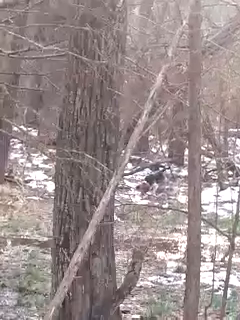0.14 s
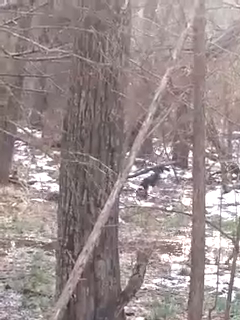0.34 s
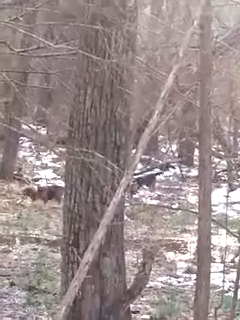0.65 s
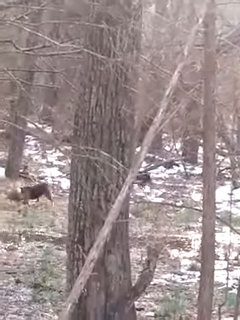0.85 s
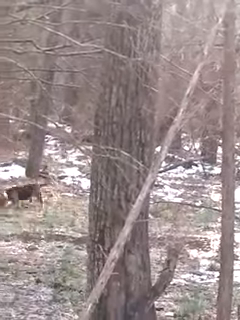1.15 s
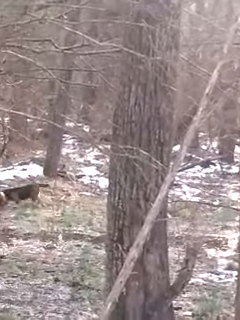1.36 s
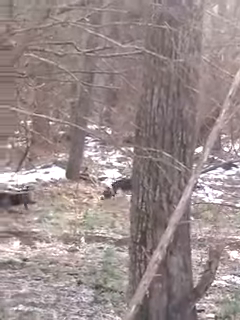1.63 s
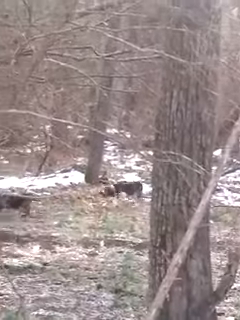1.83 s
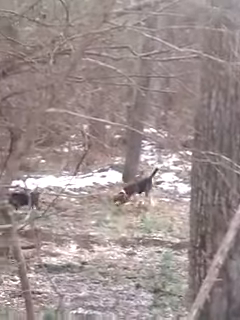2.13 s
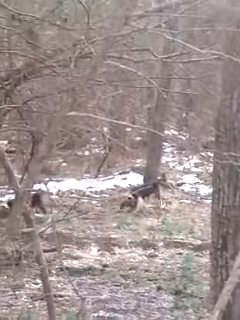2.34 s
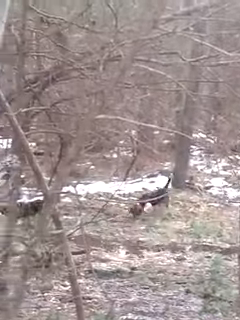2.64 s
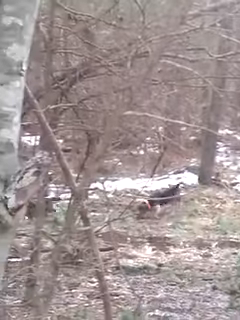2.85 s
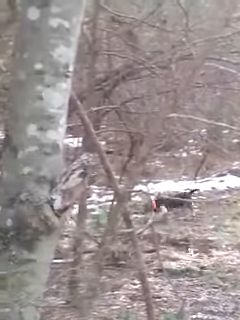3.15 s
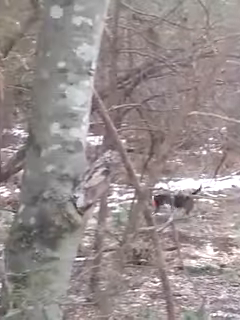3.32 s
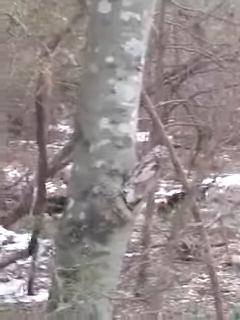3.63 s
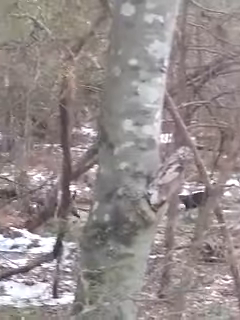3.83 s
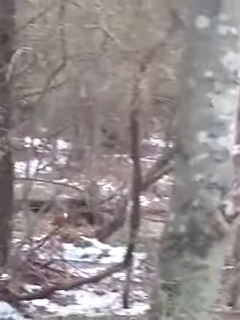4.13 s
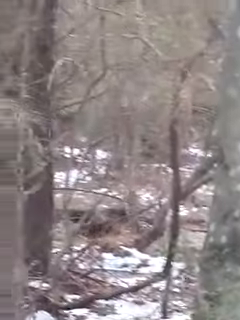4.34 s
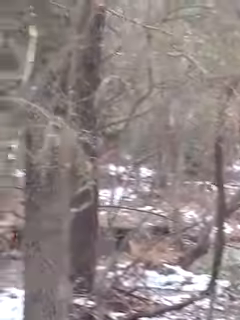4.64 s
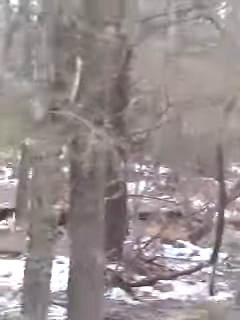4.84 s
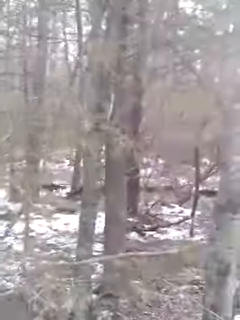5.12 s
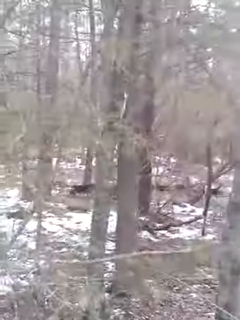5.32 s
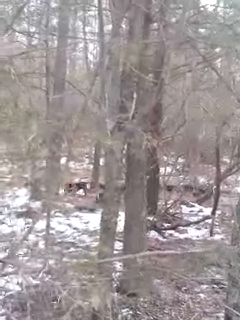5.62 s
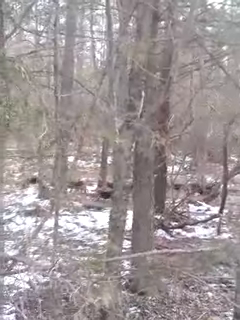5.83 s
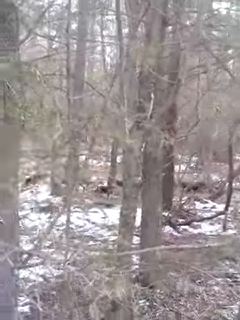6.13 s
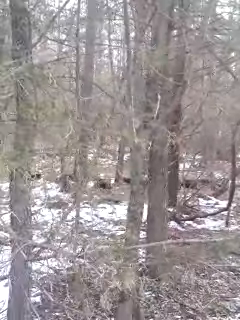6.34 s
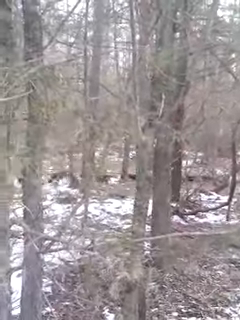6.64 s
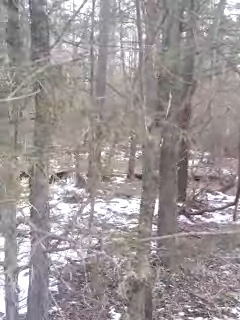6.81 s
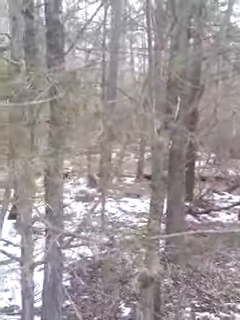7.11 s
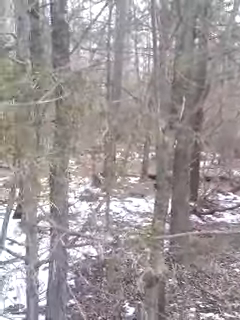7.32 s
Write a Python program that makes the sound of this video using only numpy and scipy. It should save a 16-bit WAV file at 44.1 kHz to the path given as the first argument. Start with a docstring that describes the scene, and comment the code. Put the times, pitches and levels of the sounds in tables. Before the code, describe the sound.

Excited hunting dogs yodel, bark and howl over one another among echoing trees, loud and slightly overloaded, then fade to a few brief cries.

```python
"""Hounds bay in a winter wood some metres away: a clear voice howls near 600 Hz, hoarse ones bark and yodel.
Howls are stacks of partials shaped by the mouth; bays mix a shaky tone with erratic pulses and puffs of air.
Breath hiss follows the pack, and the trunks throw the voices back as a tail of scattered noise.
Twigs snap as sharp cracks with low bumps and leaves rustle as grainy swells, over a faint outdoor hush.
The loudest peaks overload the input, where a fast limiter and a clipper hold them."""
import sys
import numpy as np
from scipy import signal
from scipy.fft import rfft, irfft, next_fast_len
from scipy.io import wavfile
from scipy.ndimage import uniform_filter1d, minimum_filter1d

SR = 44100
rng = np.random.default_rng(int(sys.argv[2]) if len(sys.argv) > 2 else 0)


def unload_wav(signal):
    """Save mono or channel-first audio to the path in sys.argv[1] as 16-bit WAV at rate SR, clipped to [-1, 1]."""
    wavfile.write(
        sys.argv[1],
        SR,
        np.round(np.clip(np.atleast_2d(signal).T, -1, 1) * 32767).astype(np.int16),
    )


def volts_from_decibels(level):
    """Turn decibel levels (scalar or array-like) into linear amplitude factors."""
    exponent = np.asarray(level, float) / 20
    return 10 ** exponent


N = 329427  # length [samples]

# Clear voice, one list a howl, times from the start of the scene:
# point_s [s], pitch_hz [Hz], level_db of the first partial [dB], mouth opening [0 shut, 1 wide]
HOWL_PATHS = [
    [(0.0, 587, -11, 0.7), (0.018, 573, -19.5, 0.45), (0.074, 566.5, -19.5, .7), (0.15, 544, -31.5, 0.6),
     (0.184, 583, -17, .3), (0.23, 508, -25.5, .3)],
    [(0.33, 596, -41, 0), (0.342, 548.2, -18.5, 0.85), (0.368, 602.2, -15.5, 0.76), (0.396, 605, -11, 0.84),
     (0.48, 622, -13, 0.53), (0.634, 557.3, -23.5, 0.97), (0.67, 537, -26, 1), (0.71, 576, -22.5, 0.7)],
    [(0.86, 614, -26.5, 0.7), (0.894, 582.8, -21, 1), (0.926, 559, -11.5, 0.8), (0.968, 574, -8, 0.2),
     (0.99, 684, -10.5, 0.9)],
    [(1.34, 528, -31, 0.3), (1.382, 591, -9.5, 0.72), (1.432, 624.2, -6.5, 0.38),
     (1.476, 597.4, -12.5, 0.67), (1.524, 578.5, -10.5, 0.2), (1.58, 555, -27, 0.7), (1.63, 509, -31.5, 1)],
    [(2.04, 562.3, -30.5, 1), (2.072, 567, -20, 0.67), (2.138, 623.7, -8, 0.41), (2.224, 643.6, -9, 0.33),
     (2.304, 609, -9, 0.44), (2.354, 589, -17.5, 0.68), (2.388, 570.5, -22, 0.92), (2.42, 557.5, -30, .9),
     (2.48, 533, -34.5, 1)],
    [(2.86, 483.6, -42, 0.9), (2.892, 581.6, -18, 0.87), (2.94, 660.2, -11, 0.99),
     (3.014, 610.5, -28, 0.87), (3.058, 606, -8.5, 0.6)],
    [(3.07, 536, -24, 0.3), (3.138, 645.3, -20, 0.5), (3.19, 555, -30, 1), (3.25, 643, -24, 0),
     (3.3, 630, -21.5, 1)],
    [(3.66, 539, -63, 0.8), (3.686, 527.3, -27, 0.75), (3.744, 606.4, -23.5, 1.08),
     (3.784, 611, -17.5, 0.91), (3.808, 605.5, -14.5, 0.85), (3.914, 583, -41.5, 1), (3.93, 593, -49.5, 1)],
    [(4.17, 517, -48.5, .6), (4.19, 568, -24, 0.98), (4.214, 609, -23, 1.1), (4.332, 619, -8, 0.3),
     (4.398, 593.5, -15, 0), (4.462, 616.5, -21, 0), (4.535, 632, -33.5, .5)],
    [(4.53, 602, -30.5, 0.6), (4.632, 601.6, -15.5, 0.4), (4.694, 576, -21.5, 0.5), (4.76, 547, -43, .9)],
    [(4.95, 661, -54, 0.7), (4.968, 612, -17.5, 0.7), (5.125, 601, -15.5, 0.71), (5.216, 640.7, -7, 0.3),
     (5.252, 562, -15.5, 0.64), (5.344, 651, -10, 0.3), (5.368, 621.6, -6.5, 0.1), (5.392, 528, -27.5, 0.9),
     (5.426, 595, -30.5, .8), (5.49, 557, -36, 1)],
    [(5.5, 623.6, -26.5, 0), (5.528, 583, -35.5, 0.8), (5.548, 551, -10.5, 1), (5.61, 629, -38, 0)],
    [(5.77, 497, -63, 0.8), (5.798, 506, -40, .9), (5.826, 547, -26, 0.81), (5.918, 571.5, -17, 0.51),
     (5.976, 530, -29, 0.75), (6.02, 508, -37, 1)],
    [(6.15, 587.5, -30.5, .2), (6.182, 553.6, -24.5, 0.3), (6.262, 563.6, -22, 0.81), (6.35, 609, -20, 0.4),
     (6.392, 611.4, -25, 0.7), (6.528, 607.4, -19, 0.63), (6.596, 533.5, -31, 0.79),
     (6.658, 595.5, -26, 0.7), (6.68, 593, -26, 0.7)],
    [(7.36, 891, -53, 0.91), (7.39, 918, -40.5, 0.95), (7.434, 886, -37.5, 0.92), (7.47, 950, -39, 1.1)],
]
# Throat of each howl: hoarse_db of the skirts at the first partial [dB], third_db and fourth_db [dB offset],
# top_db of the partials above the fourth [dB offset]
HOWL_THROATS = [(-19, 2.5, -1, 6), (-21, -7, -1, 4.5), (-18, 2, 3, 2), (-22.5, 8, -3, 2),
                (-22.5, 1.5, -3, 3), (-21, -12, 4, -11), (-16.5, 3.5, 3.5, 4), (-13.5, 1.5, -0.5, -5),
                (-25.5, 1, 2.5, -2.5), (-26.5, 2, 2.5, 2.5), (-19.5, 1.5, -1, -2), (-16.5, -6, 0.5, -2.5),
                (-8, 0, 3, -1.5), (-16.5, 3, 5.5, 7.5), (-21, -18, -21, -2)]
# Spells where strong and weak pulses alternate, adding lines half-way between partials:
# start_s [s], end_s [s], depth against the first partial [ratio]
PULSE_HALVING = [(4.215, 4.37, 0.33), (5.054, 5.244, 0.21)]
# Partials 2-4 against the first, mouth shut and mouth wide open: level_db [dB]
SHUT_MOUTH_DB = [-46.5, -51, -58]
OPEN_MOUTH_DB = [5, -10, -8.5]
# Partials 5-13 of a howl against the fourth: level_db [dB]
UPPER_PARTIALS_DB = [-13, -19, -23, -28, -27, -33, -36, -40, -46]
FLASH_DB, FLASH_S = 9.5, 0.06  # partials from the third up flare as a howl breaks out, and this fades
VOWEL_DB, VOWEL_S = 5.5, 0.056  # rms swell of each overtone as the tongue shifts, and its smoothing time

# Hoarse voices, barks and sliding squeals, one list a bay, times from the start of the scene:
# point_s [s], pitch_hz [Hz], level_db [dB], roughness [0-1, clipped]
BAY_PATHS = [
    [(0.0, 651, -27.5, .5), (0.074, 753.6, -4.5, 0.5), (0.09, 739.4, -13, 0.2), (0.162, 695.5, -12.5, 0.1),
     (0.21, 745, -30.5, 0)],
    [(0.07, 841, -18.5, 1), (0.09, 951, -10, 0.5), (0.154, 875, -20.5, .05), (0.21, 900, -34, .2)],
    [(0.35, 789, -17, 0.3), (0.376, 747, -14.5, 0.4), (0.408, 780, -22.5, 0.9), (0.446, 796, -19.5, .2),
     (0.5, 785, -10, 0.2), (0.652, 752, -26.5, 0.4), (0.714, 801, -19, 1.1), (0.76, 925, -38.5, .4)],
    [(0.84, 762, -18.5, 0), (0.858, 722, -14.5, 0), (0.874, 727.5, 3, 0.6), (0.928, 647.5, -4.5, 0.3),
     (0.998, 662.7, -8.5, 0.16), (1.096, 657.6, -7.5, 0.14), (1.174, 676.7, -11.5, 0),
     (1.24, 718, -13, 0.3), (1.26, 695, -30, 0.8)],
    [(1.2, 815.5, -20.5, 0), (1.276, 878.4, -10.5, .2), (1.34, 1064, -23.5, 0.1), (1.428, 1334, -8.5, 0.8),
     (1.458, 887, -16.5, 0.5), (1.534, 842, -23, 0), (1.568, 760, -13, .75), (1.6, 745, -41.5, 0)],
    [(1.355, 621, -30, 0.6), (1.385, 657, -16, 0.7), (1.44, 657, -15, 0.6), (1.49, 607, -36, 0.1)],
    [(1.67, 786, -50.5, 0.2), (1.68, 782, -14, 0), (1.7, 794, -5, 0.46), (1.78, 699.4, -11, 0.4),
     (1.866, 689.4, -6, 0.5), (1.894, 718.5, -9, 0), (1.956, 685.6, -13.5, 0), (2.0, 680, 8, 0.08)],
    [(1.8, 781.6, -13.5, 0.8), (1.826, 809.2, -20.5, 0.5), (1.87, 734.6, -9, 0.4), (1.96, 753.6, -9.5, 0.5),
     (2.026, 921, -15, 0.2), (2.044, 1145, -16.5, 0), (2.08, 1030, -15.5, 0.5)],
    [(2.2, 841, -18, 0.5), (2.254, 913.3, -19, 0.7), (2.344, 896, -19, 0.6), (2.36, 848, -32.5, 0.3),
     (2.392, 930, -29.5, 0.5), (2.43, 940, -17.5, 0.8)],
    [(2.51, 606, -47, 0.5), (2.55, 896.3, 2.5, 0.5), (2.584, 759.7, -8.5, 0.4), (2.608, 646.5, -18, .6),
     (2.71, 612, -25, .35), (2.768, 685.6, -18, 0.7), (2.81, 692, -43, 0.8)],
    [(3.04, 771.8, -23.5, 0.1), (3.08, 862, -10.5, 0.8), (3.11, 688.7, -16.5, 1.1),
     (3.182, 623.5, -19, 0.4), (3.216, 748, -22, 0.7), (3.244, 865.5, -8.5, 0.2),
     (3.282, 847.5, -22.5, 0.3), (3.318, 645, -22, 1), (3.512, 685.6, -19.5, 0.9), (3.53, 717, -10, 0)],
    [(3.84, 743, -39, 1.1), (3.858, 828, -17, 0.3), (3.875, 928, -21.5, .3), (3.95, 920, -38, .7)],
    [(4.17, 665, -50, 0.3), (4.202, 653, -18.5, 0.7), (4.238, 662.6, -3, 0), (4.25, 611, -11.5, 0.4),
     (4.3, 657, -15, 0.5)],
    [(4.33, 656, -22.5, 0.5), (4.386, 763, -20.5, 0.5), (4.46, 802.3, -29, .3), (4.528, 692.4, -24, 0.6),
     (4.56, 698, -21.5, 0.4), (4.702, 877, -29.5, 0.6), (4.728, 1114, -26.5, 0.2), (4.76, 1064, -51, 0.1)],
    [(4.94, 976, -45, 0.4), (4.96, 1001, -6.5, .6), (4.986, 906.5, -9, 0.7), (5.018, 806.4, -1, 0.16),
     (5.094, 679.6, -9.5, 0.5), (5.13, 740, -7, .07)],
    [(5.07, 864.6, -29.5, 0.3), (5.144, 986, -14.5, 0.2), (5.256, 1038, -32, 0.2), (5.31, 906.7, -19, 0.6),
     (5.4, 1073, -24.5, 0), (5.44, 977, -33.5, 0)],
    [(5.5, 690.7, -20.5, 0.4), (5.534, 684.5, -5.5, .55), (5.632, 639.4, -9.5, 0.24),
     (5.688, 711.5, -17.5, 0.3), (5.708, 786, -14.5, 0.5), (5.73, 828, -6.5, 0.2)],
    [(6.14, 688.6, -63, .1), (6.172, 729.3, -12.5, 0.1), (6.196, 681.3, -1, 0.9), (6.226, 671, -8.5, 0),
     (6.332, 892, -12, 0.4), (6.36, 804, -43.5, 0.7)],
    [(6.17, 918, -18.5, .4), (6.188, 990, -19, 0), (6.2, 911, -22, 0.4), (6.25, 770, -0.5, .05)],
    [(6.37, 752, -21, 0.1), (6.428, 815, -30.5, 0.6), (6.444, 791.5, -43, .6), (6.556, 774.4, -29.5, 0.6),
     (6.608, 907, -31, 0.7), (6.66, 880, -34.5, .6)],
    [(6.82, 756, -37, .2), (6.848, 849, -9, .95), (6.884, 939, -9, .95), (6.916, 675.4, -6.5, 0.4),
     (6.96, 676.6, -13.5, .6), (7.004, 797.5, -13, .6), (7.06, 820, -24.5, 0.4)],
    [(7.17, 821, -42.5, 0), (7.19, 792, -28, 0), (7.202, 792.4, -19, 0.4), (7.276, 720, -25.5, 0.9),
     (7.32, 825, -34.5, 0.5)],
    [(7.36, 797, -30, 0.3), (7.376, 831, -29, 1), (7.41, 857, -27, 0.7), (7.47, 918, -26.5, 0)],
]
# Mouth of each bay: bright_db against its level [dB], half_fade_db, half the later change [dB],
# middle_mouth_hz, the resonance at middle pitch [Hz], overtone_db of partials 2-4 [dB]
BAY_MOUTHS = [(-24.5, -5, 2700, -39.5), (-30, -1.5, 2300, -32.5), (-15.5, -6.5, 2300, -37),
              (-22.5, -3.5, 2000, -31.5), (-20.5, 2.5, 1900, -31), (-2.5, 3, 2700, -30),
              (-13, -14, 2000, -29), (-29.5, 4.5, 1900, -26.5), (-16.5, -0.5, 1750, -31.5),
              (-19.5, 0.5, 2170, -31), (-18, 0.5, 2100, -31), (-12, -4.5, 2300, -23.5),
              (-12.5, -2, 2150, -27), (-21, 0.5, 1600, -30.5), (-17, -11, 2150, -35),
              (-10.5, -2.5, 1700, -37.5), (-9.5, -21.5, 2400, -25.5), (-15, -7, 2200, -27),
              (-20, 1, 2800, -32), (-7, -0.5, 780, -31), (-8.5, -13, 1270, -35), (-22.5, 7, 2300, -34.5),
              (-15.5, -1, 1750, -30)]
# Colour of the low part of the rasp, from the chest: freq_hz [Hz], level_db [dB]
CHEST_COLOUR = [(400, -36), (520, 7.5), (700, 4), (950, 10.5), (1300, -1), (1600, -13.5), (2500, -54.5)]
# Colour of the bright part of the rasp, from the mouth: freq_hz [Hz], level_db [dB]
MOUTH_COLOUR = [(1100, -6), (1450, 2.5), (1800, 5.5), (2300, 8), (2700, 4), (3200, 1), (3600, -13.5),
                (5000, -53), (8500, -45.5), (10000, -75), (14000, -87)]
BRIGHT_FADE_S = 0.18  # time in which the bright rasp settles
MIDDLE_HZ, MOUTH_FOLLOWS = 780, 0.4  # mouth resonance rises as this power of pitch over middle pitch

# Level difference of one source between the two microphone ports: freq_hz [Hz], left_minus_right_db [dB]
PORT_TILT = [(100, 4.8), (500, -2.5), (1000, 0.4), (2000, 0.5), (3000, 8.5), (4000, -4.5), (7000, -11),
             (10000, 5)]
# Phase by which the left port leads the right: freq_hz [Hz], lead_rad [radians]
PORT_LEAD = [(260, -.2), (600, 0), (780, .1), (1380, -.5), (1720, -.2), (2070, .9), (2840, .3), (4500, .8),
             (8000, 1.5)]

# Colour of air past the teeth: freq_hz [Hz], level_db [dB]
TEETH_COLOUR = [(3000, -9), (3700, -1.5), (4300, 6), (5200, 4), (6000, -1), (7100, 3), (8300, -1.5),
                (9500, -31.5), (13000, -53)]
BREATH_DB, BREATH_FOLLOWS = -41.5, 0.56  # hiss where the brightened pack has rms 1; dB for each dB of the pack
BREATH_S = 0.011  # smoothing of the loudness that the hiss follows

# Decay of the echo among the trunks: freq_hz [Hz], t60_s [s]
WOOD_DECAY = [(300, 0.5), (600, 0.86), (1200, 0.8), (2500, 0.95), (5000, 1.52), (10000, 0.35)]
# Left-right likeness of that echo: freq_hz [Hz], likeness [-1 to 1]
WOOD_LIKENESS = [(500, .98), (750, .92), (1200, .3), (2500, 0), (6000, 0)]
WOOD_DB = -11

# Twigs snapping: start_s [s], crack_db peak [dB], thud_db [dB], left_minus_right_db of the crack [dB],
# thud_hz [Hz]
TWIG_SNAPS = [(0.9074, -8.5, -30, 3, 60), (0.9151, -16.5, -28, 4.5, 60), (1.3865, -18, -55, 7.5, 100),
              (2.4, -19.5, -60, -0.5, 150), (2.865, -17, -87, 0.5, 150), (4.3903, -16.5, -35, -4.5, 170),
              (4.5124, -23.5, -42, 10, 170), (4.5485, -10, -37, 20.5, 170)]
# Colour of dry cracks and leaves: freq_hz [Hz], level_db [dB]
TWIG_COLOUR = [(150, -5.5), (600, 0), (1500, 1.5), (3000, 4.5), (6000, -10.5), (9000, -14.5),
               (13000, -31.5), (15000, -53)]
# Dry leaves shifting close by: start_s [s], length_s [s], level_db [dB]
LEAF_RUSTLES = [(3.8, .09, -33), (1.385, .09, -34), (.86, .09, -34)]

# Colour of the outdoor hush: freq_hz [Hz], level_db [dB]
HUSH_COLOUR = [(20, -48), (45, -37.5), (65, -10), (125, -6.5), (250, 0.5), (450, 0.5), (1000, 3),
               (2000, -9), (4000, -17), (6300, -22.5), (8000, -21.5), (10000, -26), (14000, -31)]
# Left-right likeness of the hush: freq_hz [Hz], likeness [-1 to 1]
HUSH_LIKENESS = [(50, 0.63), (130, .7), (250, 0.93), (1000, 0.22), (4000, 0.25), (10000, 0.048)]
# Moving air, felt mostly below 300 Hz: point_s [s], level_db [dB]
AIR_GUSTS = [(0, 8), (.6, 1.5), (2, 3), (2.999, -7.5), (4.199, -3), (5.501, 2), (6.5, 2), (7.47, 4.5)]
HUSH_DB = -41.5


def evened(x):
    """Scales a sound to rms 1."""
    return x / np.sqrt(np.mean(x ** 2) + 1e-20)


def read(points, hz):
    """Reads a curve along a logarithmic frequency axis."""
    f, value = np.transpose(points)
    return np.interp(np.log(hz + 1), np.log(f + 1), value)


def add(mix, s, sound):
    """Lays a sound into the mix at s seconds."""
    part = mix[..., max(round(s * SR), 0):][..., :sound.shape[-1]]
    part += sound[..., :part.shape[-1]]


def coloured(x, points):
    """Filters a sound by a colour curve and scales it to rms 1."""
    size = next_fast_len(len(x) + 2048)
    gain = volts_from_decibels(read(points, np.fft.rfftfreq(size, 1 / SR)))
    return evened(irfft(rfft(x, size) * gain, size)[:len(x)])


def smoothed_2d(x, bins, frames):
    """Smooths random values over frequency and time, then scales them to rms 1."""
    return evened(uniform_filter1d(uniform_filter1d(x, bins, 0), frames, 1))


def wander(count, seconds):
    """Smooth chance of rms 1 that changes in about this time."""
    width = max(round(seconds * SR), 1)
    return evened(uniform_filter1d(uniform_filter1d(rng.standard_normal(count), width), width))


def curves(rows):
    """Draws straight lines between the points of a voice, sample by sample."""
    s, *columns = np.transpose(rows)
    t = np.arange(s[0], s[-1], 1 / SR)
    return t, [np.interp(t, s, c) for c in columns]


def edges(t, rise, fall):
    """Rounded fade in and out, in seconds."""
    fade_in = np.clip((t - t[0]) / rise, 0, 1)
    fade_out = np.clip((t[-1] - t) / fall, 0, 1)
    return np.sin(np.pi / 2 * fade_in * fade_out) ** 2


def resonate(x, hz, width):
    """Shifts the curve hz down to zero, smooths, and shifts back: a resonance of gain 1."""
    turn, r = np.exp(2j * np.pi * np.cumsum(hz) / SR), np.exp(-np.pi * width / SR)
    return 2 * (turn * signal.lfilter([1 - r], [1, -r], x / turn)).real


def paired(frames, same, size):
    """Two channels of random short-time spectra with the given likeness."""
    a, b, c, d = rng.standard_normal((frames, size // 2 + 1, 4)).T
    like = np.clip(read(same, np.fft.rfftfreq(size, 1 / SR)), -1, 1)[:, None]
    left = a + 1j * b
    return np.array([left, like * left + np.sqrt(1 - like ** 2) * (c + 1j * d)])


def howl(rows, hoarse_db, third_db, fourth_db, top_db):
    """Regular folds: partials brightened by the open mouth, the higher ones shakier, with hoarse skirts."""
    jitter, shimmer_db = .007, 1.4  # rms pitch ratio; rms dB at the first partial
    smear = .5  # power of the partial number by which shimmer and skirts grow
    t, (hz, level_db, mouth) = curves(rows)
    partial_db = [level_db]
    for shut, wide in zip(SHUT_MOUTH_DB, OPEN_MOUTH_DB):
        partial_db.append(level_db + shut + (wide - shut) * mouth)
    flash_db = FLASH_DB * np.exp(-(t - t[0]) / FLASH_S)
    partial_db[2] = partial_db[2] + third_db + flash_db
    partial_db[3] = partial_db[3] + fourth_db + flash_db
    partial_db += [partial_db[3] + top_db + db for db in UPPER_PARTIALS_DB]

    angle = 2 * np.pi * np.cumsum(hz * (1 + jitter * wander(len(t), 0.0086))) / SR
    stack = np.zeros(len(t))
    for k, db in enumerate(partial_db, 1):
        skirt = 1 + volts_from_decibels(hoarse_db) * k ** smear * wander(len(t), .003)
        vowel_db = VOWEL_DB * wander(len(t), VOWEL_S) * (k > 2)
        shake_db = shimmer_db * k ** smear * wander(len(t), 0.018)
        stack += volts_from_decibels(db + vowel_db + shake_db) * skirt * np.cos(k * angle + k * k)

    depth = sum(d * np.clip(np.minimum(t - a, b - t) / 0.0024, 0, 1) for a, b, d in PULSE_HALVING)
    halves = np.cos(3 * angle / 2) + 0.15 * np.cos(angle / 2) + 0.22 * np.cos(5 * angle / 2)
    voice = stack + depth * volts_from_decibels(partial_db[0]) * halves
    return t[0], np.sqrt(2) * voice * edges(t, 0.0043, 0.04)


def bay(rows, bright_db, half_fade_db, middle_mouth_hz, overtone_db):
    """Irregular folds: a shaky tone, and erratic pulses with puffs of air that ring chest and mouth."""
    flutter_db, focus, width_hz = 3.5, 7.6, 300  # tone's rms flutter; gain and width of mouth resonance
    jitter, chaos, puff_gain = .02, .12, .75  # pitch shake, scaled by roughness; rms log pulse rate; ratio
    t, (hz, level_db, rough) = curves(rows)
    rough = np.clip(rough, 0, 1)
    shake = jitter * (.6 + 2 * rough) * wander(len(t), 0.004)
    angle = 2 * np.pi * np.cumsum(hz * (1 + shake)) / SR
    tone = np.sqrt(2) * volts_from_decibels(flutter_db * wander(len(t), 0.0054)) * np.cos(angle)
    for k in (2, 3, 4):
        tone += volts_from_decibels(overtone_db + VOWEL_DB * wander(len(t), VOWEL_S)) * np.cos(k * angle)

    turns = np.cumsum(hz * np.exp(chaos * wander(len(t), .005))) / SR
    pulses = evened(sum(np.cos(2 * np.pi * k * turns) for k in range(1, 12)))
    # each puff is strongest at its pulse and dies away until the next
    puffs = evened((0.39 + np.exp(-(turns % 1) / 0.75)) * rng.standard_normal(len(t)))
    drive = (pulses + puff_gain * puffs) * volts_from_decibels(flutter_db / 2 * wander(len(t), 0.0066))

    mouth_hz = middle_mouth_hz * (hz / MIDDLE_HZ) ** MOUTH_FOLLOWS
    bright = coloured(drive + focus * resonate(drive, mouth_hz, width_hz), MOUTH_COLOUR)
    settled = 1 - np.exp(-((t - t[0]) / BRIGHT_FADE_S) ** 2)
    bright *= volts_from_decibels(bright_db + 2 * half_fade_db * settled)
    voice = (1 - rough) * tone + rough * coloured(drive, CHEST_COLOUR) + bright
    return t[0], volts_from_decibels(level_db) * voice * edges(t, 0.003, 0.02)


def ports(x):
    """The two microphone ports hear one source with their own colour and phase."""
    hz = np.fft.rfftfreq(2 * N, 1 / SR)
    half = volts_from_decibels(read(PORT_TILT, hz) / 2) * np.exp(.5j * read(PORT_LEAD, hz))
    return irfft(rfft(x, 2 * N) * np.array([half, 1 / half]), 2 * N)[:, :N]


def breath(pack, patchy_db=5.0):
    """Air past the teeth: patchy hiss in two mouth resonances that follows the brightened pack's loudness."""
    pack = signal.lfilter([1, -.95], 1, pack) * 10  # weight the loudness towards the treble
    z = paired(N // 128 + 5, [(4000, 0.11), (9000, 0.067)], size=512)  # (Hz, left-right likeness)
    patches = smoothed_2d(rng.standard_normal(z.shape[1:]), 4, 30)
    z *= volts_from_decibels(read(TEETH_COLOUR, np.fft.rfftfreq(512, 1 / SR))[:, None] + patchy_db * patches)
    hiss = evened(signal.istft(z, nperseg=512, noverlap=384)[1][:, :N])
    power = abs(uniform_filter1d(pack ** 2, round(BREATH_S * SR)))
    level_db = BREATH_DB + BREATH_FOLLOWS * 10 * np.log10(power + 1e-7)
    return volts_from_decibels(level_db + np.array([[-2.5], [2.5]])) * hiss  # 5 dB stronger on the right


def wood(x, gap_s=0.02, sparse_db=3.5):
    """Scattered returns from trunks, uneven in time, each band dying at its own rate."""
    z = paired(SR * 3 // 2 // 64, WOOD_LIKENESS, size=256)
    t, hz = np.arange(z.shape[-1]) * 64 / SR, np.fft.rfftfreq(256, 1 / SR)
    decay_db = -60 * t / read(WOOD_DECAY, hz)[:, None]
    z *= volts_from_decibels(decay_db + sparse_db * rng.standard_normal(len(t))) * (t > gap_s)
    tail = signal.istft(z, nperseg=256, noverlap=192)[1]
    tail = tail / np.linalg.norm(tail[0])
    return volts_from_decibels(WOOD_DB) * signal.fftconvolve(x[None], tail, axes=1)[:, :N]


def snaps(crackle_s=.006, crackle_db=-28, thud_s=0.02):
    """A thin dry crack with a faint crackle around it and a low bump through the camera body."""
    out, t = np.zeros((2, N)), np.arange(3000) / SR
    for s, crack_db, thud_db, pan_db, thud_hz in TWIG_SNAPS:
        noise = rng.standard_normal((3, len(t)))
        break_up = volts_from_decibels(crackle_db) * noise[:2] * np.exp(-t / crackle_s)
        break_up[:, 20] += 1  # the crack itself, one click
        crack = np.array([coloured(side, TWIG_COLOUR) for side in break_up])
        crack /= abs(crack).max(1, keepdims=True)
        side_db = np.array([[pan_db], [-pan_db]]) / 2

        low = signal.butter(2, [thud_hz / 2, thud_hz * 2], "band", fs=SR, output="sos")
        thud = evened(signal.sosfilt(low, noise[2])) * np.exp(-t / thud_s) * np.clip(t / .002, 0, 1)
        add(out, s, volts_from_decibels(crack_db + side_db) * crack + volts_from_decibels(thud_db) * thud)
    return out


def rustles():
    """Dry leaves: short swells of grainy hiss, unlike in the two ports."""
    out = np.zeros((2, N))
    for s, length_s, level_db in LEAF_RUSTLES:
        count = round(length_s * SR)
        grains = rng.standard_normal((2, count)) * volts_from_decibels(3.0 * wander(count, .002))
        hiss = np.array([coloured(side, TWIG_COLOUR) for side in grains])
        add(out, s, volts_from_decibels(level_db) * np.hanning(count) * hiss)
    return out


def hush(patchy_db=2.5):
    """Distant air in the branches: patchy noise whose bass swells and sinks with the gusts."""
    z = paired(N // 256 + 5, HUSH_LIKENESS, size=1024)
    patches = smoothed_2d(rng.standard_normal(z.shape[1:]), 10, 12)
    hz = np.fft.rfftfreq(1024, 1 / SR)[:, None]
    t = np.arange(z.shape[-1]) * 256 / SR
    gust_db = np.interp(t, *np.transpose(AIR_GUSTS)) / (1 + (hz / 300) ** 4)
    z *= volts_from_decibels(read(HUSH_COLOUR, hz) + patchy_db * patches + gust_db)
    return volts_from_decibels(HUSH_DB) * evened(signal.istft(z, nperseg=1024, noverlap=768)[1][:, :N])


def scene():
    """The pack at the two ports, its breath and echo, then twigs, leaves and hush."""
    clear, hoarse = np.zeros((2, N))
    for rows, throat in zip(HOWL_PATHS, HOWL_THROATS):
        add(clear, *howl(rows, *throat))
    for rows, mouth in zip(BAY_PATHS, BAY_MOUTHS):
        add(hoarse, *bay(rows, *mouth))
    # small throats give off almost nothing under 500 Hz
    small_throat = signal.butter(8, 520, "high", fs=SR, output="sos")
    pack = clear + signal.sosfilt(small_throat, hoarse)
    return ports(pack) + wood(pack) + breath(pack) + snaps() + rustles() + hush()


def low_pass(x):
    """Removes everything above the highest recorded frequency."""
    return signal.sosfilt(signal.butter(12, 14600, fs=SR, output="sos"), x)


def record(dry, ceiling=1.0, hold_s=0.0054):
    """A fast limiter turns the loudest cycles down and the input clips what is left."""
    width = round(hold_s * SR)
    room = minimum_filter1d(np.minimum(ceiling / (abs(dry).max(0) + 1e-9), 1), width)
    gain = uniform_filter1d(room, width) ** 1.23  # turns down a little further than needed
    held = np.clip(dry * gain, -1, 1)
    return low_pass(held)


dry = scene()
out = record(dry)
unload_wav(out)
```